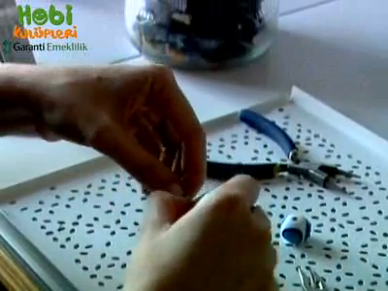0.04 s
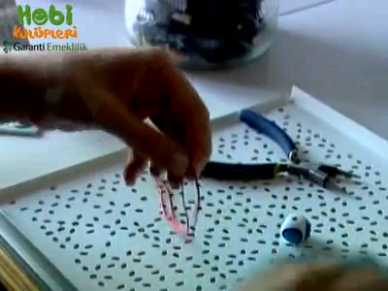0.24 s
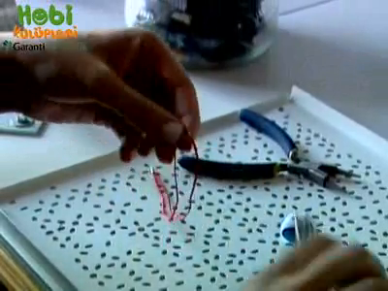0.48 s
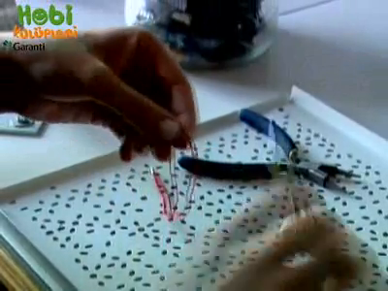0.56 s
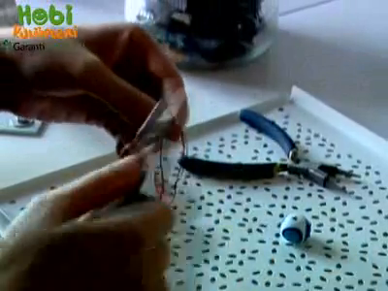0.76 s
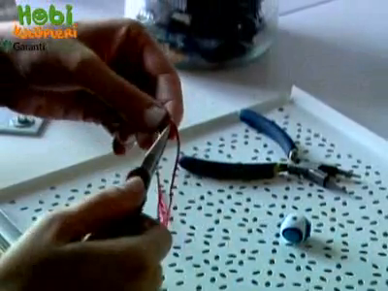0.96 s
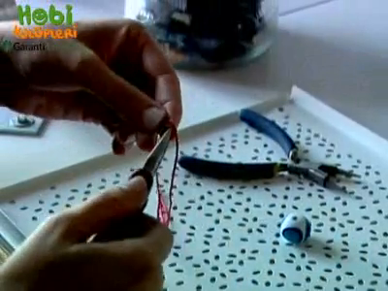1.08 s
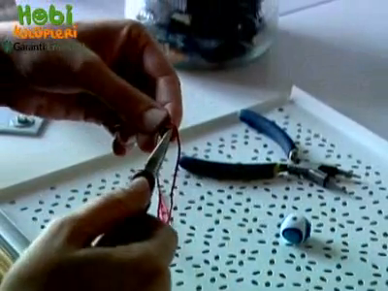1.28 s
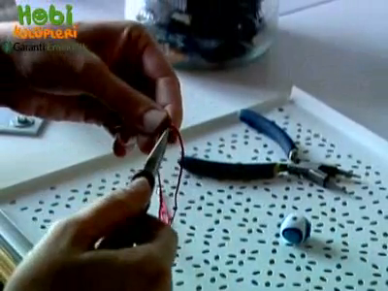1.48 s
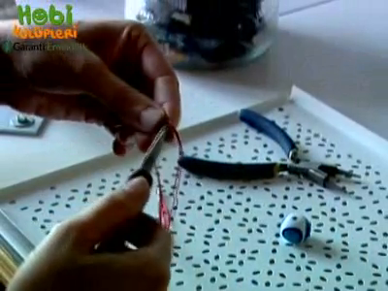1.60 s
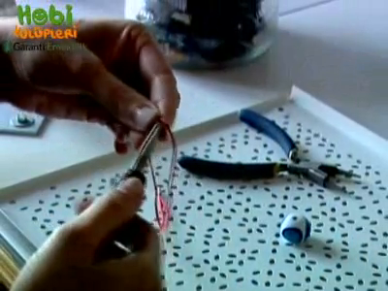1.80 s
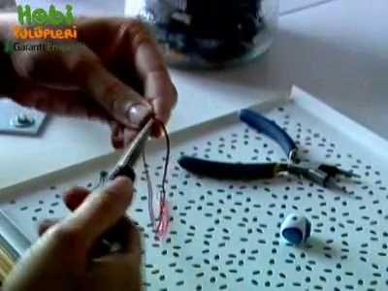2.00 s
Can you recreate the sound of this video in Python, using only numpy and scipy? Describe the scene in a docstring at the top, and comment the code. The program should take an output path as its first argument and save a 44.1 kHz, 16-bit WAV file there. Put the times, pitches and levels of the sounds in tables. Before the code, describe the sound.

Small steel tools clink together, then pliers scrape briefly across a tray and knock free with a sharp, ringing clatter. Faint bead ticks and finger rubbing follow, heard close up in a small, quiet room with a soft fan hum.

```python
"""A small, quiet room with a tray of steel tools. The tools clink together, then a pair of pliers is dragged
out, scraping, and knocks free: the tray bumps and the freed pliers ring on. Each contact is a sharp crack that
sets the steel's modes ringing. Fingers rub on wire and beads, which tick faintly. Underneath, a fan rushes and
hums, its low tones swelling now and then."""
import sys
import numpy as np
from scipy import signal
from scipy.fft import rfft, irfft, next_fast_len
from scipy.io import wavfile

SR = 44100
rng = np.random.default_rng(int(sys.argv[2]) if len(sys.argv) > 2 else 0)


def transcribe(u):
    """Save the signal u as a 16-bit wav file named by the first command-line argument.

    u: samples, shape (n,) or (channels, n), limited to [-1, 1]; the rate is SR.
    q: integer samples, one column per channel.
    """
    v = np.clip(np.atleast_2d(u).T, -1, 1)
    q = np.round(v * 32767).astype(np.int16)
    wavfile.write(sys.argv[1], SR, q)


N = 90404

# The ring of the pliers. Each row: mode frequency in Hz, relative level in dB, t60 in seconds.
PLIER_MODES = [(958, -20, .1), (1551, -19, .2), (2270, -23, .12), (2595, -20, .14), (2960, -19, .18),
               (4090, -20.5, .12), (5815, -12.5, .11), (6693, -8, .05), (7318, -18, .14), (8366, -15, .12),
               (9302, -15.5, .1), (10171, -16, .1), (10335, -14.5, .08), (10710, -18, .06)]
# Broad resonances of pliers and tray together. Each row: frequency in Hz, gain in dB.
PLIER_COLOUR = [(200, -10), (480, -5.5), (700, -8), (960, -4.5), (1180, -6), (1550, -2.5), (2550, -2),
                (2750, 0.5), (3000, -3), (3750, -3), (4100, -2.5), (4750, -3), (5900, 0), (6180, -1.5),
                (6600, 3.5), (7350, 5), (8900, 5), (10200, 7.5), (11000, 3.5)]


def plier_knocks():
    """The pliers strike the other tools on their way out, cracking and ringing."""
    # Each row: start in seconds, level in dB, ring relative to the blow in dB.
    knocks = [(.4962, -27.5, 9.5), (.5115, -20, 7), (.548, -39, -7), (.5745, -16, 12), (.5803, -10.5, -7),
              (.5855, -15, -10), (.5935, -5, -2), (.5958, -4.5, -12), (.602, -21, -8), (.6165, -18, -4)]
    return steel(knocks, PLIER_MODES, PLIER_COLOUR, crack_t60=0.0091)


def plier_slide():
    """Steel catches and slips on the tray, exciting the pliers."""
    # The pressure of the drag. Each row: time in seconds, level in dB.
    drag = [(.36, -70), (.368, -40), (.405, -42.5), (.46, -47), (.492, -93), (.499, -43), (.555, -38.5),
            (.59, -33), (.624, -35), (.645, -45), (.76, -110)]
    # The tone of the scrape. Each row: frequency in Hz, gain in dB.
    tone = [(300, 7), (2000, 3), (5000, 4), (11000, -10)]
    slips = grains(per_s=1100, spread_db=2.5) * curve(drag)
    scrape = colour(colour(slips, tone), PLIER_COLOUR)
    return room(scrape) + undb(-6) * resonate(slips, PLIER_MODES)


def hollow(x):
    """Notch out the narrow bands in which pliers and tray hardly respond."""
    # Each row: centre in Hz, width in Hz.
    gaps = [(760, 170), (2770, 200), (3680, 200), (7010, 220)]
    for hz, width in gaps:
        x = signal.lfilter(*signal.iirnotch(hz, hz / width, fs=SR), x)
    return x


def tool_clinks():
    """Small tools touch and ring together; the touched piece adds a short ping of its own."""
    # Each row: start in seconds, level in dB, relative ring in dB, ping in Hz, relative ping in dB.
    clinks = [(0.3635, -21.5, -10, 7640, -1), (.3655, -16.5, -19, 8150, -7), (.3884, -13, 2.5, 7580, -1),
              (.3925, -29, -7, 10850, 2), (0.409, -22, 2, 9500, -5), (.4240, -12.5, 0, 5640, -9),
              (0.4269, -19, -2, 5900, -4), (0.4404, -16.5, -6, 10340, 4)]
    # Their shared ring. Each row: frequency in Hz, relative level in dB, t60 in seconds.
    modes = [(7378, -15, .07), (7580, -18, .09), (7820, -16, .09), (8130, -18, .08), (9150, -16, .1),
             (10335, -14, .06), (10560, -12, .015), (10850, -10, .05), (11010, -10, .02)]
    # The tone of the contact. Each row: frequency in Hz, gain in dB.
    tone = [(300, -16), (900, -0.5), (1500, -5), (2500, -3.5), (4300, 1), (5800, -1.5), (7000, 0),
            (8000, 5), (10000, 3.5), (11000, 5)]
    pings = sum(undb(db) * at(ring([(hz, ping_db, 0.056)]), s)  # t60 of 56 ms
                for s, db, _, hz, ping_db in clinks)
    return steel(clinks, modes, tone, crack_t60=0.012) + pings


def freed_tools():
    """The pliers ring on once they come free."""
    # Each row: frequency in Hz, relative level in dB, t60 in seconds.
    modes = [(4032, -1, .13), (5270, -7, .23), (5787, -2, .17), (6557, 2, .15), (9372, 1, .17),
             (10070, 2, .13)]
    return undb(-22) * at(ring(modes), s=.596)


def tray_bump():
    """The tray gives a low bump as the pliers lift."""
    # Each row: frequency in Hz, relative level in dB, t60 in seconds.
    modes = [(78, 0.5, 0.029), (180, 3, 0.043), (264, 4, 0.26), (966, 4, 0.018), (2360, 2, 0.018)]
    return undb(-18) * at(ring(modes), s=.5922)


def bead_ticks():
    """Beads and wire tick lightly, each tick with one broad resonance."""
    # Each row: start in seconds, level in dB, centre in Hz.
    ticks = [(0.129, -43, 4540), (0.194, -29.5, 3640), (.7695, -38, 8000), (0.784, -29, 7200),
             (0.8354, -33, 3300), (1.004, -31.5, 6540), (1.021, -29.5, 8100), (1.097, -35, 8000),
             (1.829, -38.5, 7540)]
    out = 0
    for s, db, hz in ticks:
        peak = [(hz / 4, -14), (hz, 3), (hz * 2, -8)]
        out = out + undb(db) * at(colour(crack(t60=0.019), peak), s)
    return out


def finger_rub():
    """Fine, grainy friction of skin on wire and handles."""
    # The strokes. Each row: time in seconds, level in dB.
    strokes = [(0, -59), (.03, -57.5), (.06, -97), (.095, -63), (.125, -58), (.22, -56), (.29, -65),
               (.32, -56.5), (.74, -58.5), (.91, -61), (1.02, -61), (1.06, -60), (1.1, -60.5), (1.15, -81)]
    # Their tone. Each row: frequency in Hz, gain in dB.
    tone = [(500, 2.5), (1500, 14), (3000, 6), (5000, 1), (8000, -2), (11000, -1)]
    return colour(grains(per_s=1500, spread_db=3.0), tone) * curve(strokes)


def fan():
    """A steady rush of air, with narrow bands of noise as its wavering hum."""
    # The tone of the rush. Each row: frequency in Hz, relative level in dB.
    rush = [(25, -25), (50, -12.5), (85, -4.5), (105, -4.5), (140, -0.5), (200, -2.5), (310, -0.5),
            (370, -4.5), (450, -2), (560, -8), (710, -11), (830, -8.5), (1080, -7), (1280, -13.5),
            (1880, -15.5), (2200, -21), (3200, -27.5), (5000, -30), (11000, -34)]
    # The hum. Each row: centre in Hz, width in Hz, level in dB.
    hum = [(81.4, 7, -60), (164.1, 7.7, -55), (243.8, 16, -55.5), (266, 5.1, -55), (416, 15.5, -55),
           (592.5, 11, -63.5), (1123, 13, -65.5)]
    f = np.arange(N // 2 + 1) * SR / N
    out = undb(-46.5) * unit(colour(rng.standard_normal(N), rush))
    for hz, width, db in hum:
        phases = np.exp(2j * np.pi * rng.random(len(f)))
        band = phases / (1 + ((f - hz) / width * 2) ** 2)
        out = out + undb(db) * unit(irfft(band, N))
    return out


def hum_swells():
    """Low tones of the hum rise and fall smoothly."""
    # Each row: peak time in seconds, length in seconds, pitch in Hz, level in dB.
    swells = [(0.217, 0.33, 164.3, -46.5), (0.435, 0.045, 268, -39.5), (0.668, 0.17, 266, -46.5),
              (0.802, 0.52, 82, -51), (1.414, 0.56, 81.5, -53), (1.913, 0.15, 162, -50)]
    t = np.arange(N) / SR
    out = 0
    for s, length, hz, db in swells:
        arch = np.cos(np.pi * np.clip((t - s) / length, -.5, .5)) ** 2
        tone = np.sqrt(2) * np.sin(2 * np.pi * (hz * t + rng.random()))
        out = out + undb(db) * arch * tone
    return out


def room(x):
    """Add quick reflections from tray and table top, then the short tail of the walls."""
    near = undb(-2.5) * burst(t60=0.043)
    walls = undb(-5) * burst(t60=.28)
    return x + through(x, at(near + walls, s=.003))


def steel(hits, modes, tone, crack_t60):
    """Each blow cracks into the room and sets the steel ringing."""
    blows = [(undb(db) * at(crack(crack_t60), s), ring_db) for s, db, ring_db, *_ in hits]
    cracks = sum(blow for blow, _ in blows)
    push = sum(blow * undb(ring_db) for blow, ring_db in blows)
    return room(colour(cracks, tone)) + resonate(push, modes)


def resonate(push, modes):
    """Each mode gathers the contacts' energy and lets it die away; loose contact blurs its pitch."""
    blur_hz = 8.5
    out = 0
    for hz, db, t60 in modes:
        decay = fade(t60) ** 2
        energy = np.maximum(through(push ** 2, decay / decay.sum()), 0)
        drift = np.cumsum(rng.standard_normal(N)) * np.sqrt(2 * np.pi * blur_hz / SR)
        tone = np.sin(2 * np.pi * hz * np.arange(N) / SR + drift)
        out = out + undb(db) * np.sqrt(2 * energy) * tone
    return out


def ring(modes):
    """Decaying modes, each with the energy its level gives."""
    t = np.arange(N) / SR
    return sum(undb(db) * unit(fade(t60) * np.sin(2 * np.pi * hz * t))
               for hz, db, t60 in modes) / np.sqrt(N)


def crack(t60):
    """A sharp contact followed by a few milliseconds of chatter."""
    x = 1.506 * burst(t60)
    x[0] += .2  # the first touch
    return x


def grains(per_s, spread_db):
    """Dense tiny contacts of uneven size."""
    contacts = rng.random(N) < per_s / SR
    signs = rng.choice([-1, 1], N)
    sizes = undb(spread_db * rng.standard_normal(N))
    return unit(contacts * signs * sizes)


def burst(t60):
    """Decaying noise of unit energy."""
    return unit(rng.standard_normal(N) * fade(t60)) / np.sqrt(N)


def colour(x, points):
    """Minimum-phase EQ from (Hz, dB) points, so nothing sounds ahead of an attack."""
    hz, db = np.array(points).T
    size = next_fast_len(2 * N) // 2 * 2
    f = np.maximum(np.arange(size // 2 + 1) * SR / size, 1)
    gain = undb(np.interp(np.log(f), np.log(hz), db))
    cepstrum = irfft(np.log(gain))
    cepstrum[1:size // 2] *= 2
    cepstrum[size // 2 + 1:] = 0
    return irfft(rfft(x, size) * np.exp(rfft(cepstrum)))[:N]


def curve(rows):
    """Gain over time from (seconds, dB) points."""
    return undb(np.interp(np.arange(N) / SR, *np.array(rows).T))


def fade(t60):
    """Exponential decay from 1, falling 60 dB in t60 seconds."""
    return np.exp(-np.log(1000) * np.arange(N) / SR / t60)


def at(x, s):
    """Delay a sound to start at s seconds."""
    return np.concatenate([np.zeros(int(max(s, 0) * SR)), x])[:N]


def through(x, response):
    """Convolve with a response."""
    return signal.fftconvolve(x, response)[:N]


def undb(db):
    """Decibels to gain."""
    return 10 ** (np.asarray(db) / 20)


def unit(x):
    """Scale to an rms of 1."""
    return x / np.sqrt(np.mean(x ** 2))


def scene():
    """Bright steel up front, faint handling behind it and the fan as a bed, in mono."""
    clinks = tool_clinks()
    pliers = hollow(plier_knocks() + plier_slide())
    handling = room(bead_ticks()) + finger_rub()
    bed = fan() + hum_swells()
    return (clinks + pliers + freed_tools() + tray_bump() + handling + bed)[None]


def record(dry):
    """The microphone cuts the top steeply."""
    top_hz = 11140
    return signal.fftconvolve(dry, signal.firwin(601, top_hz, fs=SR)[None], mode="same")


dry = scene()
out = record(dry)
transcribe(out)
```